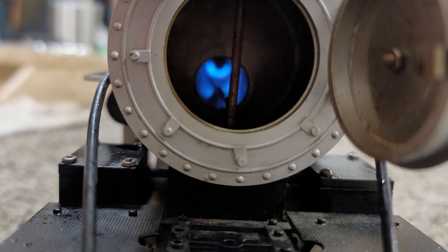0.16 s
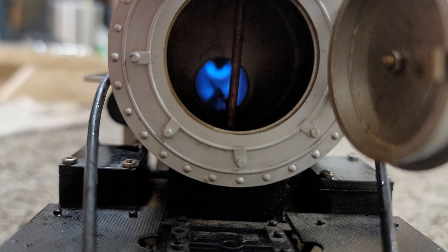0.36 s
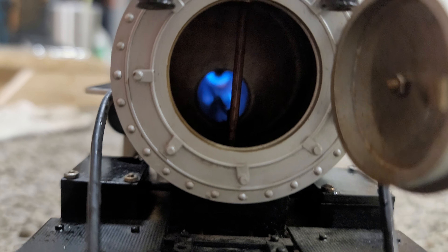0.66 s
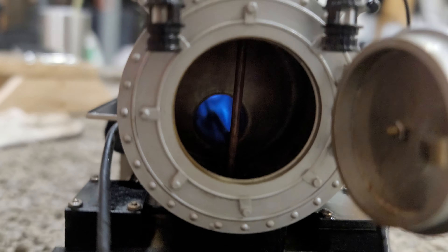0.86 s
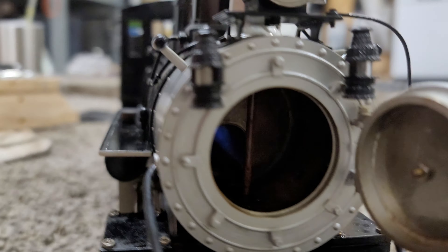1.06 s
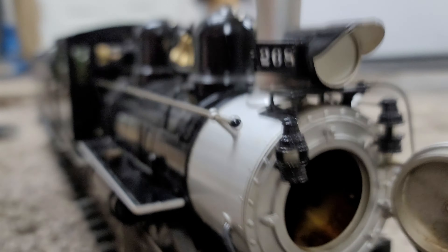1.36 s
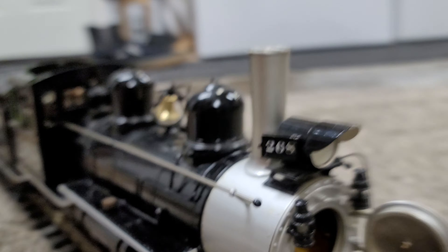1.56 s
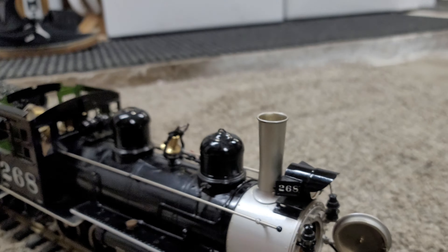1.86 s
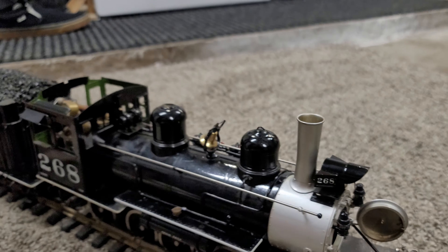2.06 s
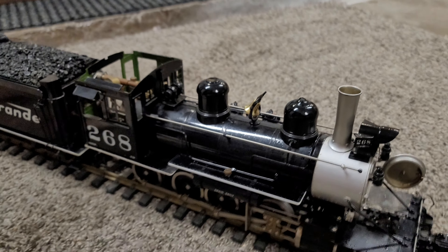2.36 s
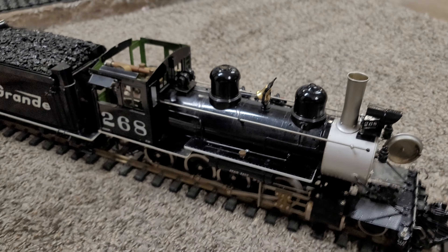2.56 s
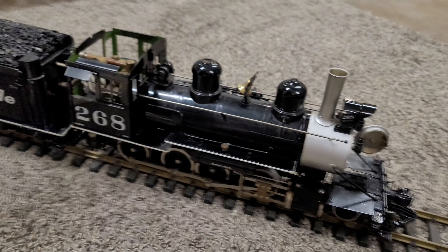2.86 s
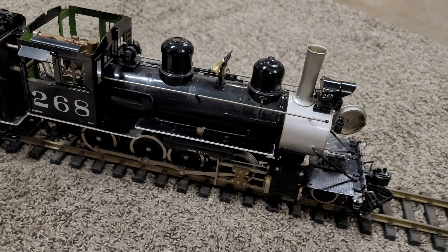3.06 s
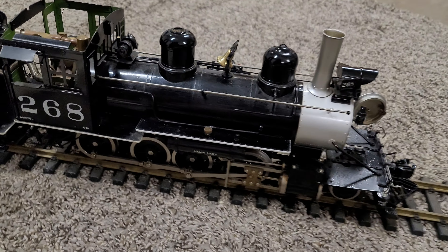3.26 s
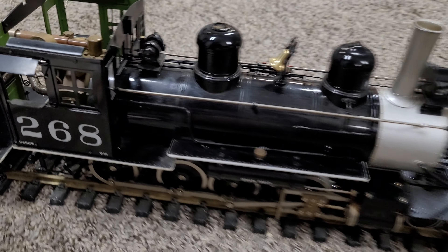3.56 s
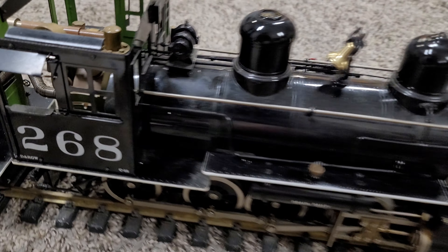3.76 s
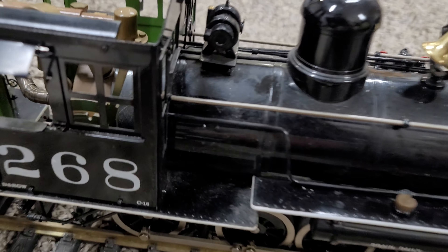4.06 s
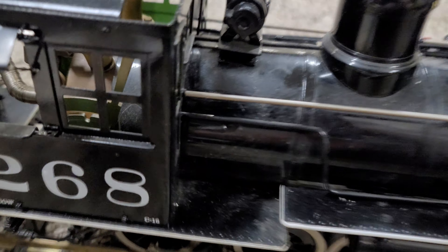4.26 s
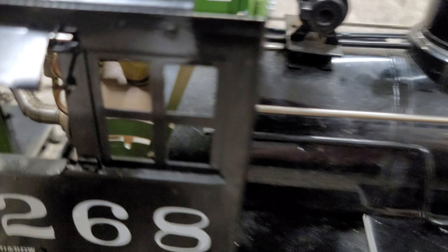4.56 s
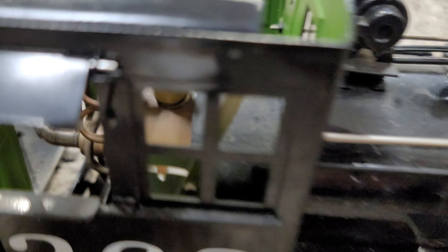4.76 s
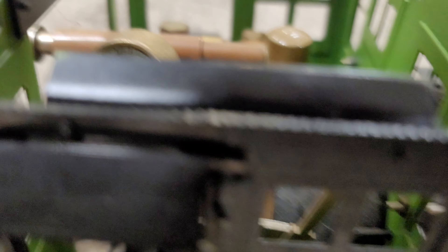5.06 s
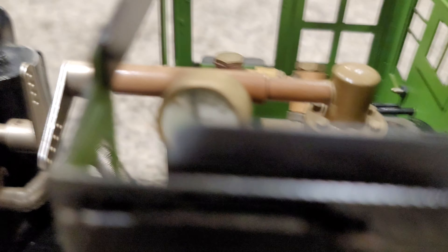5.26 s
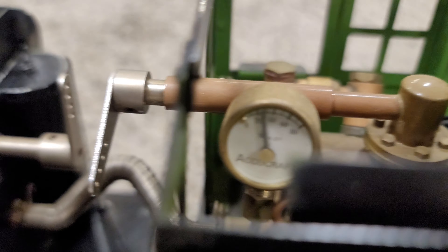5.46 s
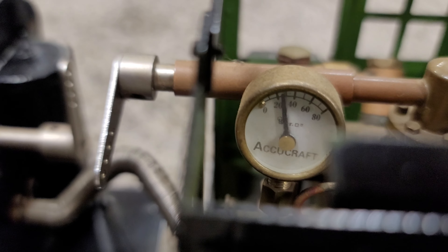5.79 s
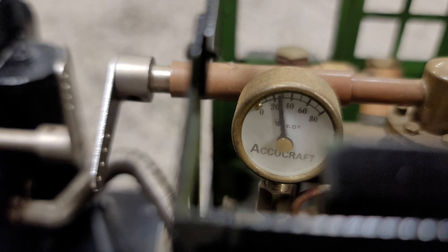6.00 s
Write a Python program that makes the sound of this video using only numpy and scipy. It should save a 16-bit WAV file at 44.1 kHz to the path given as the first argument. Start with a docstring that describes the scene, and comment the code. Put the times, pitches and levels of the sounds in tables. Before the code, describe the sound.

A small gas flame roars low and hums through a metal flue, with one sharp metallic clack, brief handling bumps, then breathy gas hiss.

```python
"""Gas burner of a model steam locomotive

The engine stands on a carpeted floor; a hand-held phone moves from its smokebox to its cab.
An unsteady flame (shaped noise) roars and rings the flue (resonances); the gas jet hisses in noise bands.
A metal part clacks in ringing modes, light contacts tick and sleeves rustle in grainy noise.
Fingers rub and tap the phone (swelling noise, pushes, short rings) over the room's rush and faint hum."""
import sys
import numpy as np
from scipy import signal
from scipy.fft import rfft, irfft, next_fast_len
from scipy.io import wavfile
from scipy.ndimage import uniform_filter1d, map_coordinates

SR = 44100
rng = np.random.default_rng(int(sys.argv[2]) if len(sys.argv) > 2 else 0)


def master_out(mix):
    """Clip the mix to full scale and print it as 16-bit PCM to the path in sys.argv[1]."""
    frames = np.transpose(np.atleast_2d(mix))
    ceiling = np.clip(frames, -1, 1)
    pcm = np.round(ceiling * 32767).astype(np.int16)
    wavfile.write(sys.argv[1], SR, pcm)


N = 270333
T = np.arange(N) / SR  # time (s)
SIZE = next_fast_len(N + SR)  # filter length, with room for echoes to die away
HZ = np.maximum(np.fft.rfftfreq(SIZE, 1 / SR), 1)
PORT_SPACING_M = 0.19  # between the phone's left and right sound openings, its "ports"


def undb(db):
    """Turn decibels into a gain."""
    return 10 ** (np.asarray(db) / 20)


def unit(x):
    """Scale a sound to an average (rms) strength of 1."""
    return x / np.sqrt(np.mean(x ** 2))


def curves(table):
    """Join each column of a table by straight lines in time."""
    s, *columns = np.transpose(table)
    return [np.interp(T, s, column) for column in columns]


def pan(db):
    """Left and right gains for a level difference, left minus right."""
    return undb(np.array([[1], [-1]]) * db / 2)


def shape(points):
    """Filter response through (f/Hz, level/dB) points that never answers before its input."""
    hz, db = np.transpose(points)
    log_gain = np.log(undb(np.interp(np.log(HZ), np.log(hz), db)))
    cepstrum = irfft(log_gain, SIZE)
    # doubling the first half of the cepstrum puts all the response after the input
    return np.exp(rfft(2 * cepstrum[:SIZE // 2], SIZE) - cepstrum[0])


def resonance(hz, width):
    """Response of one resonance, with gain 1 at its centre."""
    return 1 / (1 + 1j * (HZ ** 2 - hz ** 2) / (HZ * width))


def bank(modes):
    """Add several resonances given as (f/Hz, width/Hz, level/dB)."""
    return sum(undb(db) * resonance(hz, width) for hz, width, db in modes)


def through(x, response):
    """Filter a sound."""
    return irfft(rfft(x, SIZE) * response, SIZE)[..., :N]


def colour(x, response):
    """Filter a sound, keeping the power that white noise would have."""
    return through(x, response / np.sqrt(np.mean(abs(response) ** 2)))


def walk(rate):
    """Smooth random wandering with a strength of 1, given about `rate` new values per second."""
    k = int(SR / rate)
    steps = np.repeat(rng.standard_normal(N // k + 1), k)
    return unit(uniform_filter1d(steps, k)[:N])


def fade(s, t60):
    """A sudden start at s that falls by 60 dB in t60 seconds."""
    return (T >= s) * np.exp(-np.log(1000) * np.clip((T - s) / t60, 0, 10))


def swell(s, length, attack_s, release_s):
    """The rise, hold and fall of one movement."""
    before = np.maximum(s - T, 0) / attack_s
    after = np.maximum(T - s - length, 0) / release_s
    return np.exp(-np.minimum(before + after, 20))


def knock(s, hz, t60):
    """A swing that starts at s and dies away."""
    return fade(s, t60) * np.sin(2 * np.pi * hz * (T - s))


def pulses(events):
    """One sharp push for each (t/s, level/dB)."""
    out = np.zeros(N)
    for s, db in events:
        out[int(s * SR)] += undb(db)
    return out


def diffuse():
    """Noise from all sides at the two ports: alike in the bass, nearly unrelated in the treble."""
    likeness = np.sinc(2 * HZ * PORT_SPACING_M / 343)  # speed of sound 343 m/s
    mid = colour(rng.standard_normal(N), np.sqrt(1 + likeness))
    side = colour(rng.standard_normal(N), np.sqrt(1 - likeness))
    return unit(np.array([mid + side, mid - side]))


def ports(x, lead_ms):
    """One sound at both ports, arriving later on the left."""
    return np.array([np.interp(T - lead_ms / 1000, T, x), x])


def glide(x, share):
    """Raise the pitch of a sound by a changing share."""
    return map_coordinates(x, [np.arange(N) + np.cumsum(share)], mode="mirror")


def saturate(x, share):
    """Partly even out the swells of a ringing tone; a share of 0 leaves them as they are."""
    envelope = uniform_filter1d(abs(signal.hilbert(x, SIZE)[:N]), size=300)
    return unit(x * envelope ** -min(share, 1))


# sputters of the flame, and some small chance swells of its roar and flue tone, before filtering:
# t/s, flue ring level/dB, low thud level/dB, ring t60/s
FLAME_BURSTS = [(0.111, -33, -32, 0.02), (0.165, -14, -21, 0.022), (0.339, -22.5, -35, 0.17),
                (0.376, -26, -36, 0.05), (0.472, -27, -47, 0.21), (0.546, -35, -36, 0.03),
                (0.579, -35, -40, 0.023), (0.658, -21.5, -21, 0.054), (0.983, -22.5, -24, 0.078),
                (1.046, -28, -23, 0.041), (1.28, -24, -17.5, 0.05), (1.354, -31.5, -25.5, 0.028),
                (1.669, -31, -30, 0.024), (1.737, -28.5, -52, 0.052), (3.355, -38, -30, 0.025),
                (3.452, -24.5, -29, 0.026), (3.547, -29, -45, 0.035), (4.225, -29, -37, 0.036),
                (4.265, -22.5, -38, 0.023), (4.349, -33, -29.5, 0.27), (4.802, -26, -31, 0.021),
                (5.429, -33.5, -29, 0.061), (5.475, -26, -25, 0.052)]
# balance of the flame's roar: f/Hz, relative level/dB per Hz
ROAR_SPECTRUM = [(20, -30), (45, -22.5), (90, -6), (145, 1.5), (200, -2.5), (270, -11.5), (450, -17.5),
                 (600, -31), (850, -39.5), (1500, -56), (4000, -91.5)]
# flue resonances before the pitch rise: f/Hz, width/Hz, relative level/dB
FLUE_MODES = [(671.3, 33, 15.5), (628.4, 27, 4), (582, 42, -4), (703, 16, -10)]
# the flue tone rises as the gas warms: share of its pitch per s, and the time (s) of its listed pitch
FLUE_RISE_PER_S, FLUE_MID_S = .004, 1.5


def burner(roar_db, flue_db, pan_db, lead_ms, cab_db, flutter_db=2, flue_room_db=-10, skirt_hz=260,
           roar_lead_ms=0.32, cab_ring_db=5, door_db=-14):
    """The turbulent flame, with its sputters and chance swells, drives a low roar and rings the flue."""
    flue_hz = FLUE_MODES[0][0]
    flame = unit(rng.standard_normal(N) * undb(flutter_db * walk(90)))
    pipe = bank(FLUE_MODES) * resonance(flue_hz, skirt_hz)
    rings, thuds = np.zeros(N), np.zeros(N)
    for s, ring_db, thud_db, t60 in FLAME_BURSTS:
        # the pitch of each ring varies a little with the heat of the gas
        detune = 1 + .03 * rng.uniform(-1, 1)
        rings += undb(ring_db) * knock(s, flue_hz * detune, t60)
        thuds += undb(thud_db) * knock(s, 107, 0.032)
    short_rings = through(rings, resonance(flue_hz, 190))
    # beneath these rings the flue sings on, its swells slightly evened out
    singing = saturate(colour(flame, pipe), .13)
    tone = undb(flue_db) * glide(singing, FLUE_RISE_PER_S * (T - FLUE_MID_S)) + short_rings
    low_thuds = through(thuds, resonance(150, 260) ** 2)
    roar = undb(roar_db) * colour(flame, shape(ROAR_SPECTRUM)) + low_thuds
    # near the open smokebox door the roar gains a brighter part around 320 Hz
    door = undb(flue_db + door_db) * colour(diffuse(), resonance(320, 380) ** 2)
    # the hollow of the cab has a faint note of its own
    hollow = undb(cab_db + cab_ring_db) * colour(flame, resonance(809, 35) ** 2)
    # the walls return some of the flue's sound from all sides
    walls = undb(flue_db + flue_room_db) * colour(diffuse(), pipe)
    direct = ports(tone, lead_ms) * pan(pan_db) + ports(roar + hollow, roar_lead_ms)
    return direct + door + walls


# gas jet whistle, before a wider resonance shapes it: f/Hz, width/Hz, relative level/dB
JET_MODES = [(4480, 370, -5), (5200, 330, -14), (6320, 600, -8.5), (8300, 300, -17)]
# the same jet heard through the open cab: f/Hz, relative level/dB per Hz
CAB_SPECTRUM = [(2500, -39.5), (4150, -15), (4550, 7), (4750, 4.5), (5150, -4.5), (5400, -5), (5800, -16),
                (6500, -12.5), (7700, -22.5), (8400, -15), (10000, -34), (16000, -43.5)]
# the fine hiss of the gas is beamed, and is met suddenly beside the boiler:
# t/s, level/dB, left minus right/dB
FINE_HISS = [(0, -82, 1), (1.4, -85, 2), (3.32, -90, -5.5), (3.45, -75.5, 3), (3.9, -80.5, -2),
             (4.4, -77, -2), (5, -79, -4), (5.5, -76.5, -10), (6.13, -79.5, -12)]


def jet(jet_db, cab_db, door_db, whistle_pan_db=14, cab_pan_db=4, door_pan_db=-4):
    """Gas rushing through the nozzle makes a breathy whistle, broader by the open cab, and fine hiss."""
    whistle_air = unit(rng.standard_normal(N) + diffuse())
    whistle = colour(whistle_air, bank(JET_MODES) * resonance(5050, 1600)) * pan(whistle_pan_db)
    cab_air = unit(rng.standard_normal(N) + .5 * diffuse())
    cab = colour(cab_air, shape(CAB_SPECTRUM)) * pan(cab_pan_db)
    fine_db, fine_pan_db = curves(FINE_HISS)
    fine = colour(diffuse(), resonance(12100, 7200) ** 2) * pan(fine_pan_db)
    # hiss of the flame at the smokebox door
    door = colour(diffuse(), resonance(5000, 1200) ** 2) * pan(door_pan_db)
    return undb(jet_db) * whistle + undb(cab_db) * cab + undb(fine_db) * fine + undb(door_db) * door


# balance of the room's rush: f/Hz, relative level/dB per Hz
ROOM_SPECTRUM = [(25, -1.5), (60, 14), (100, 16), (400, 7), (800, 0.5), (1050, 5.5), (1400, 4),
                 (2000, -1.5), (3000, -9), (4000, -13), (5000, -22), (6800, -21.5), (8000, -31),
                 (16000, -46)]
# the rush at the right port against the left: f/Hz, level/dB
RIGHT_SHADE = [(1500, -0.5), (2800, 1.5), (4000, -6), (5200, -11), (6800, -12), (8000, -1), (16000, 0.5)]
# hum in the room, around which it wavers: f/Hz, level/dB
HUM = [(398.4, -58), (2247, -70.5)]


def room(rush_db=-49):
    """Filtered noise gives an even rush of air, coloured at the right port; wavering sines give a hum."""
    hum = np.zeros(N)
    for hz, db in HUM:
        level = undb(db + 0.42 * walk(6.2))
        hum += level * np.sin(2 * np.pi * hz * T + 1.3 * walk(9))
    left, right = undb(rush_db + 0.067 * walk(4.9)) * colour(diffuse(), shape(ROOM_SPECTRUM))
    return np.array([left, through(right, shape(RIGHT_SHADE))]) + hum


# the hand sways the phone: t/s, length/s, level/dB
SWAYS = [(2.17, 0.24, -41.5), (2.455, 0.069, -42), (2.606, 0.086, -43), (2.847, 0.28, -47.5)]
# a finger rubs the case: t/s, length/s, level/dB, f/Hz
RUBS = [(2.645, 0.037, -37, 97), (2.906, 0.065, -37, 118), (3.069, 0.022, -40, 116)]
# finger taps beside the right port: t/s, push level before the case/dB, ring level/dB, ring f/Hz, ring t60/s
TAPS = [(2.23, 8.5, -18, 2620, 0.0098), (2.2321, -9, -23, 1900, 0.0046), (2.232, 1, -23, 653, 0.025),
        (2.7243, 0.5, -33, 605, 0.0072), (2.7283, -0.5, -26.5, 1110, 0.018),
        (2.783, -19, -18.5, 1680, 0.0095), (2.7846, -10, -25, 1260, 0.011), (2.7957, -5, -33, 1900, 0.0046),
        (2.8072, 10.5, -16, 1150, 0.007), (2.8085, -14, -23.5, 690, 0.031), (2.8109, 1, -24, 1750, 0.0064)]
# what the phone's case passes on of a tap's push: f/Hz, level/dB
CASE = [(60, -18), (300, -4.5), (600, 4), (850, 0), (1100, -3), (2100, -1.5), (2900, -8.5), (4000, -12.5),
        (4800, -25), (6400, -24), (9500, -35), (16000, -35)]
GRIP_ATTACK_S, GRIP_RELEASE_S = 0.011, 0.018
HOLD_DB = -70  # tremor of the steady hand


def handling(tap_pan_db=-16, rumble_pan_db=-10, rub_width_hz=80):
    """A moving hand gives deep swells, rubbing skin gives low noise and taps push and ring the case."""
    swaying = undb(HOLD_DB)
    for s, length, db in SWAYS:
        swaying = swaying + undb(db) * swell(s, length, GRIP_ATTACK_S, GRIP_RELEASE_S)
    # one part of the noise is shared by the ports, the other is separate at each
    shake = unit(rng.standard_normal(N) + 0.99 * rng.standard_normal((2, N)))
    sway = swaying * colour(shake, resonance(49, 43) ** 2)
    skin = unit(rng.standard_normal(N) + 0.87 * rng.standard_normal((2, N)))
    rub = np.zeros((2, N))
    for s, length, db, hz in RUBS:
        stroke = swell(s, length, GRIP_ATTACK_S, GRIP_RELEASE_S)
        rub += undb(db) * stroke * colour(skin, resonance(hz, rub_width_hz) ** 2)
    rings = sum(undb(db) * knock(s, hz, t60) for s, _, db, hz, t60 in TAPS)
    taps = through(pulses([row[:2] for row in TAPS]), shape(CASE)) + rings
    return sway + rub * pan(rumble_pan_db) + np.array([undb(tap_pan_db) * taps, taps])


# small ticks and clinks: t/s, level before filtering/dB, centre f/Hz, width/Hz, t60/s, left minus right/dB
TICKS = [(0.0314, -42.5, 3400, 4200, 0.022, 3), (0.8415, -19, 12600, 5030, 0.0049, -5.5),
         (0.841, -29, 6800, 1300, 0.0066, 0), (0.8408, -27.5, 3750, 1400, 0.006, 6),
         (0.8534, -39, 3300, 1800, .012, 0), (0.905, -41.5, 2200, 3000, 0.017, 10),
         (0.943, -45.5, 3600, 3500, 0.053, 12), (0.978, -40.5, 2770, 420, 0.039, 1),
         (1.161, -42, 2730, 380, 0.036, 7.5), (1.281, -39.5, 1410, 700, 0.022, 6),
         (2.455, -46, 1700, 1370, 0.02, -7), (2.722, -32, 4160, 3600, 0.015, 2),
         (2.7257, -34.5, 5500, 2000, 0.01, 0), (2.7285, -42, 5000, 5000, 0.0061, -4),
         (2.7825, -27.5, 6000, 12000, 0.0026, -3), (2.7956, -23, 5660, 4200, 0.0027, -1),
         (2.8049, -27, 3670, 3400, 0.006, 3), (2.8305, -41, 7000, 10000, 0.0073, 3),
         (3.77, -39, 3800, 3000, 0.0069, 7), (5.185, -59, 6000, 7050, 0.027, 3)]


def ticks():
    """Light contacts, each a short burst of noise in one steep resonance."""
    out = np.zeros((2, N))
    for s, db, hz, width, t60, side_db in TICKS:
        burst = rng.standard_normal((2, N)) * fade(s, t60)
        out += undb(db) * pan(side_db) * colour(burst, resonance(hz, width) ** 2)
    return out


# blows on the metal: t/s, relative level/dB
CLACKS = [(0.7301, -19.5), (0.7318, -11), (0.7369, -22.5), (0.7456, -23), (0.7715, -39), (0.791, -38),
          (0.8146, -38)]


def chime(modes):
    """Every blow sets the modes ringing anew; the loose part buzzes as it rings."""
    t, out = T[:SR // 2], np.zeros(N)
    for s, blow_db in CLACKS:
        ring = np.zeros(len(t))
        for hz, db, t60 in modes:
            ring += undb(db - 60 * t / t60) * np.sin(2 * np.pi * (hz * t + rng.random()))
        out[int(s * SR):][:len(t)] += undb(blow_db) * unit(ring)
    return out * (1 + .35 * walk(500))  # the buzz


# main modes of the clacking metal: f/Hz, relative level/dB, t60/s
METAL = [(1334, -9, .16), (1404, -9, .16), (1466, -2, .2), (1530, 9, .025), (1567, -1, .13),
         (1600, -2, .12), (1720, 5, .025), (1916, -13, .18), (2407, -8, .19), (2706, -1, .26),
         (2814, -6, .33), (2880, -8, .19), (3042, -5, .25), (3211, -7, .2), (3330, -9, .15),
         (3539, -8, .15), (4914, -15, .2), (4960, -15, .16), (5100, -14, .1), (5230, -16, .17)]
# high, faint modes of the same metal: f/Hz, relative level/dB, t60/s
METAL_HIGH = [(6691, 1, 0.16), (7300, -4, 0.18), (8786, -12, 0.18), (9740, -11.5, 0.1), (12660, -20, 0.12),
              (12900, -25, 0.26), (13700, -19, 0.29), (14460, -22, 0.25)]
# balance of the metal's crack: f/Hz, relative level/dB per Hz
CRACK_SPECTRUM = [(50, -37), (200, 1), (1150, -19), (1400, 2.5), (1800, 4.5), (2080, -9), (2500, 4.5),
                  (3400, 0), (4000, -12.5), (5200, -1), (5850, -33), (6700, -5), (7700, -9.5), (9200, -18),
                  (10200, -19), (11500, -12), (12600, -7), (13800, -14), (15000, -16)]
# low modes of the whole engine, before filtering: f/Hz, level/dB, t60/s
BODY = [(202, -15, 0.015), (440, -20, 0.019), (657, -25, 0.15)]
# frequencies that the metal hardly radiates: f/Hz, width/Hz
METAL_GAPS = [(2080, 118), (5950, 270)]


def clacks(ring_db=-35.5, high_ring_db=-46, crack_db=-1, crack_t60=0.025,
           tail_db=-19, tail_t60=0.2, lead_ms=0.212):
    """Metal strikes metal and chatters: a crack, ringing modes and a short room tail of softened noise."""
    ring = undb(ring_db) * chime(METAL) + undb(high_ring_db) * chime(METAL_HIGH)
    crack_fade = sum(undb(db) * fade(s, crack_t60) for s, db in CLACKS)
    tail_fade = sum(undb(db) * fade(s, tail_t60) for s, db in CLACKS)
    crack_response = shape(CRACK_SPECTRUM)
    direct = ring + undb(crack_db) * crack_fade * colour(rng.standard_normal(N), crack_response)
    walls = undb(tail_db) * tail_fade * colour(diffuse(), crack_response * resonance(2470, 5700))
    # the main blow also shakes the whole engine
    main_s = CLACKS[1][0]
    shaking = sum(undb(db) * knock(main_s, hz, t60) for hz, db, t60 in BODY)
    thud = through(shaking, resonance(210, 660) ** 2)
    gaps = np.prod([1 - resonance(hz, width) for hz, width in METAL_GAPS], axis=0) ** 2
    return through(ports(direct, lead_ms) + walls, gaps) * pan(4.2) + thud


def snags(per_s=450, spread_db=2.5):
    """Single fibres catch and let go: scattered pushes of unequal size."""
    size_db = spread_db * np.minimum(rng.exponential(size=(2, N)), 4)
    sizes = undb(size_db) * rng.choice([-1, 1], (2, N))
    return unit(sizes * (rng.random((2, N)) < per_s / SR))


# strokes of a sleeve: t/s, length/s, level/dB, left minus right/dB, rasp against the stroke/dB
STROKES = [(0.842, 0.22, -51, 6.5, -17.5), (0.917, 0.036, -54, 6, -1.5), (2.296, 0.028, -54, -7.5, -9),
           (2.364, 0.21, -60.5, -6.5, -18), (2.612, 0.19, -49.5, -5.5, -14), (2.549, 0.018, -46, -10, -4.5),
           (2.575, 0.022, -49.5, -9, -6), (2.643, 0.045, -45.5, -8, -16), (2.663, 0.0048, -43, -16, -23),
           (2.802, 0.14, -42.5, -4, -8.5), (2.936, 0.023, -46.5, -8, -25), (3.012, 0.014, -52.5, -7.5, -23),
           (3.665, 0.054, -52.5, 4.5, -15), (3.779, 0.027, -48.5, 5.5, -21)]
# balance of the cloth's sound: f/Hz, relative level/dB per Hz
CLOTH_SPECTRUM = [(40, -26), (200, 6.5), (700, -3.5), (1200, 7), (2200, -2), (3300, 0), (5000, -11.5),
                  (6800, -24), (8500, -27.5), (10500, -24), (12500, -27), (16000, -23)]
STROKE_ATTACK_S, STROKE_RELEASE_S = 0.015, 0.011


def sleeves(grain_db=-0.5, catch_db=2.5, rasp_hz=5700, rasp_width_hz=2800, rasp_pan_db=8, rasp_grain_db=1.5):
    """Cloth slides in many tiny catches, made of noise and pushes; each stroke adds some grainy rasp."""
    grain = undb(grain_db * walk(700) + catch_db * walk(70))
    catches = colour(unit((diffuse() + snags()) * grain), shape(CLOTH_SPECTRUM))
    rasp_noise = unit(diffuse() * undb(rasp_grain_db * walk(500)))
    rasp = colour(rasp_noise, resonance(rasp_hz, rasp_width_hz) ** 2) * pan(rasp_pan_db)
    # overlapping strokes add their powers
    coarse_power, rasp_power = 0, 0
    for s, length, db, side_db, rasp_db in STROKES:
        movement = swell(s, length, STROKE_ATTACK_S, STROKE_RELEASE_S)
        power = (undb(db) * pan(side_db) * movement) ** 2
        coarse_power = coarse_power + power
        rasp_power = rasp_power + power * undb(rasp_db) ** 2
    return np.sqrt(coarse_power) * catches + np.sqrt(rasp_power) * rasp


# a narrow note of the jet beams out of the cab's side window: t/s, level/dB
WINDOW_NOTE = [(3.7, -89), (3.95, -80), (4.2, -76.5), (4.7, -81), (5.0, -89)]
WINDOW_HZ, WINDOW_WIDTH_HZ = 4580, 170


def window_note(waver=.004):
    """The phone crosses the beam of the jet's wavering whistle, a narrow band of noise."""
    db, = curves(WINDOW_NOTE)
    whistle = colour(rng.standard_normal(N), resonance(WINDOW_HZ, WINDOW_WIDTH_HZ) ** 2)
    return undb(db) * glide(whistle, waver * walk(6)) * pan(18.0)


# the way round the engine: t/s, distance to smokebox/m, distance to cab/m,
# flue tone left minus right/dB, lead of the right port/ms
PATH = [(0, .15, 0.36, -0.5, 0.24), (.7, 0.16, 0.37, -1, 0.14), (1.25, 0.2, 0.35, -4, 0.38),
        (1.85, 0.35, 0.45, 11, 0.33), (2.75, 0.27, 0.14, 1, 0.22), (3.25, 0.35, 0.76, 3, 0.12),
        (3.6, 0.35, 0.35, 3, 0.26), (4.15, 0.33, 0.27, -3.5, 0.38), (4.7, 0.4, 0.16, -6.5, 0.32),
        (5.2, 0.51, 0.3, -5.5, 0.39), (6.13, 0.61, 0.24, -5.5, 0.31)]
# the hiss of the open cab is met as the phone clears its roof: t/s, level/dB
CAB_TOP = [(4.4, -94), (5.0, -78), (5.2, -66.5), (5.4, -63), (6.13, -63.5)]
# the hiss of the flame is lost as the phone leaves the smokebox door: t/s, level/dB
DOOR_HISS = [(0, -78), (2.4, -78.5), (3.1, -88.5)]
# levels at NEAR_M from each source (dB)
NEAR_M, FLUE_DB, ROAR_DB, JET_DB = .15, -36.5, -41.5, -70
ROAR_FALLOFF = 0.65  # the roar fills the room, so it falls more slowly with distance


def scene():
    """Engine, hand and room together; roar, flue tone and jet whistle grow louder as the phone nears them."""
    smokebox_m, cab_m, pan_db, lead_ms = curves(PATH)
    smokebox_db = 20 * np.log10(NEAR_M / smokebox_m)
    nozzle_db = 20 * np.log10(NEAR_M / cab_m)
    cab_db, = curves(CAB_TOP)
    door_db, = curves(DOOR_HISS)
    # the roar leaves by both ends of the boiler; the nearer one is heard
    roar_db = ROAR_DB + ROAR_FALLOFF * np.maximum(smokebox_db, nozzle_db)
    flame = burner(roar_db, FLUE_DB + smokebox_db, pan_db, lead_ms, cab_db)
    gas = jet(JET_DB + nozzle_db, cab_db, door_db) + window_note()
    return flame + gas + room() + handling() + ticks() + clacks() + sleeves()


# each port's own resonance, a dip on the left and a peak on the right: f/Hz, width/Hz, level/dB
PORT_COLOUR = [(8460, 1300, -8.5), (8360, 500, 4)]
TOP_HZ = 15900


def record(dry):
    """The ports' resonances colour the treble and the phone's steep low-pass filter cuts the top."""
    heard = []
    for x, (hz, width, db) in zip(dry, PORT_COLOUR):
        heard.append(through(x, 1 + (undb(db) - 1) * resonance(hz, width)))
    top_cut = signal.ellip(10, .2, 80, TOP_HZ, fs=SR, output="sos")
    return signal.sosfilt(top_cut, np.array(heard))


dry = scene()
out = record(dry)
master_out(out)
```